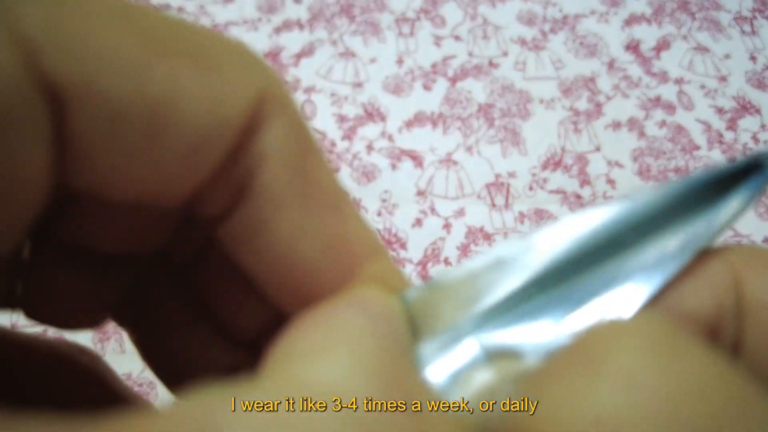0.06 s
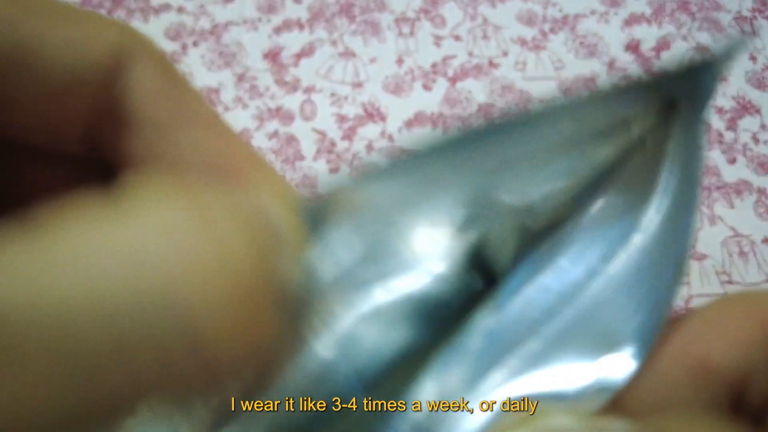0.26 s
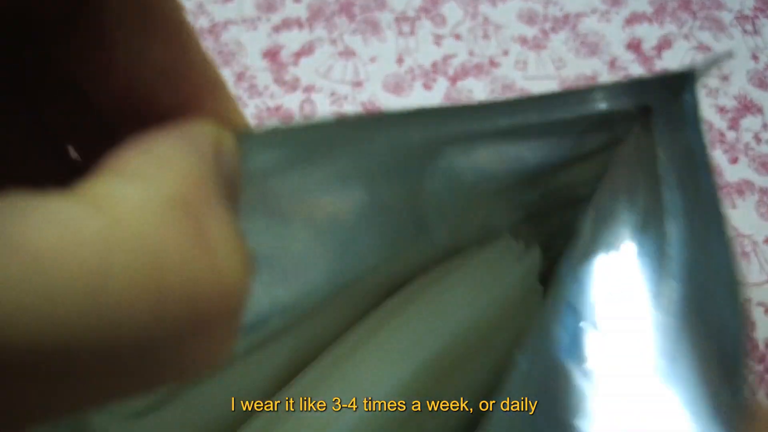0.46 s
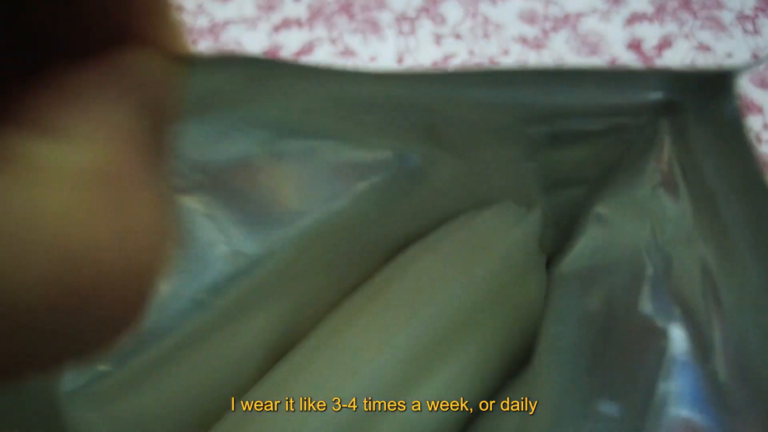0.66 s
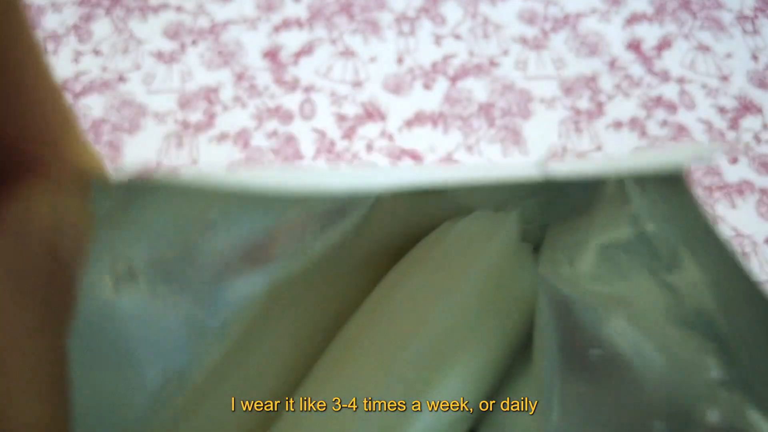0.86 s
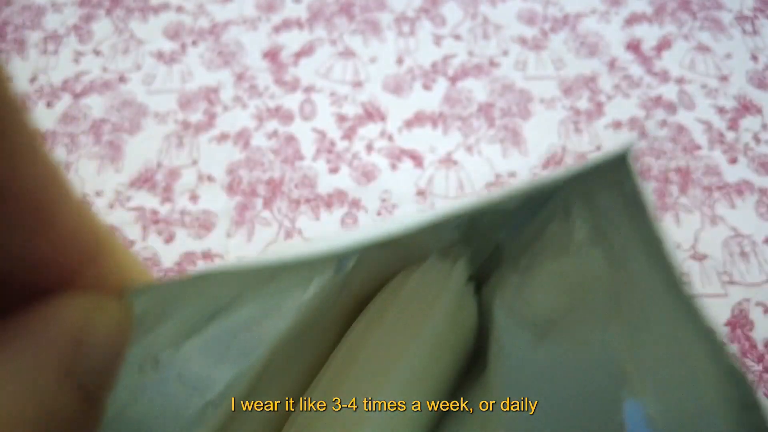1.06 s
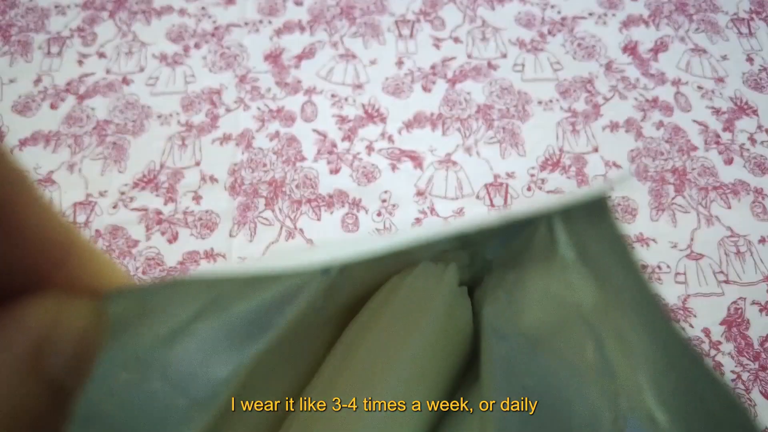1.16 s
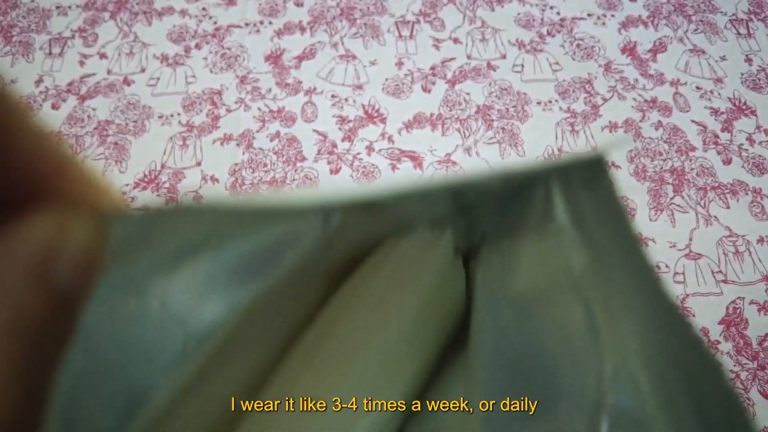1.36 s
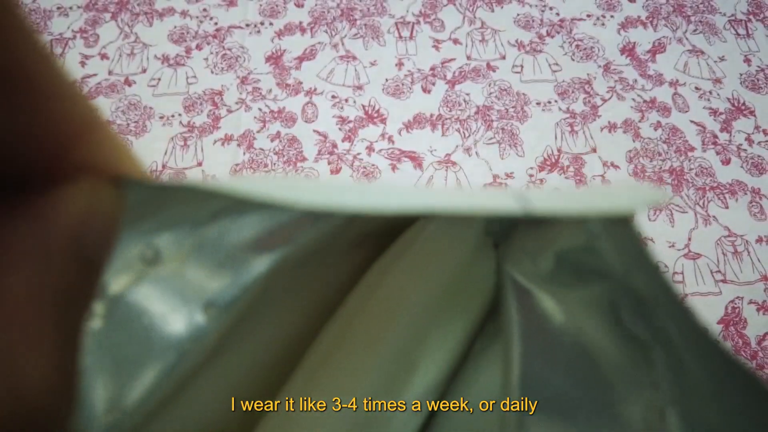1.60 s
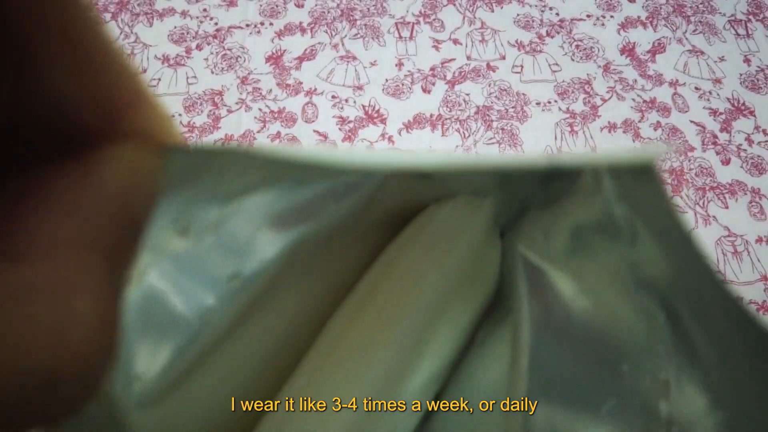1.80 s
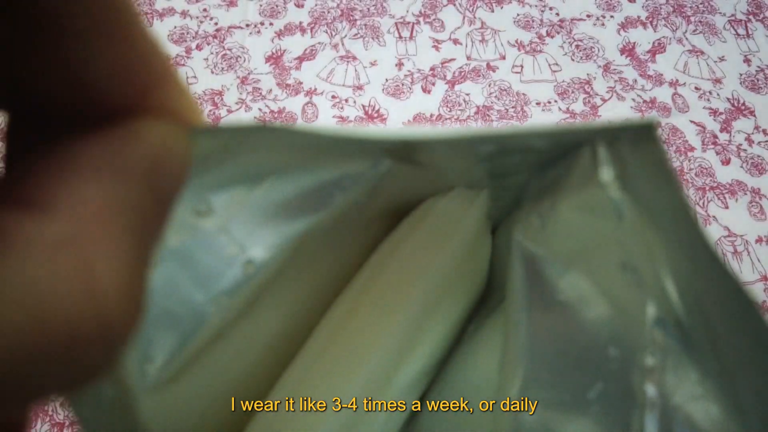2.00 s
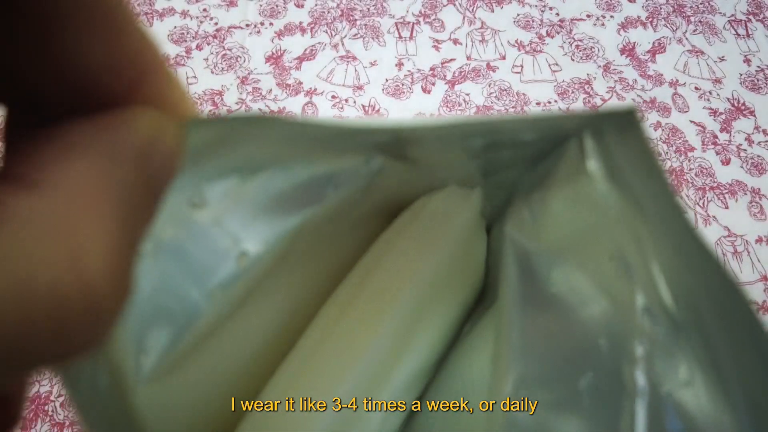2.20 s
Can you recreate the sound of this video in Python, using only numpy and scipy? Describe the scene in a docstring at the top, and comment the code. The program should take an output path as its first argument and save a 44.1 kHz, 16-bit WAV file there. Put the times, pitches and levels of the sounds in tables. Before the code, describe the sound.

A stiff foil pouch is pulled open very close to the microphone: small ticks, a short crackle, then sharp irregular snaps within the first second, followed by soft finger rustle in a quiet small room.

```python
"""Small ticks and a short crackle as the lips of a stiff foil pouch part, pulled open by hand.
The pouch is close to the microphone in a small quiet room. Its walls then buckle in sharp snaps:
noise bursts, each with a damped panel ring, and low rings where the pouch puffs its air.
Foil slides softly on the fingers as shaped noise, over a rumble of the grip.
Room air and a faint wavering hum lie underneath; a diffuse echo follows the snaps and crackle."""
import sys
import numpy as np
from scipy import signal
from scipy.io import wavfile

SR = 44100
rng = np.random.default_rng(int(sys.argv[2]) if len(sys.argv) > 2 else 0)


def log_audio(samples):
    """Write samples as a 16-bit WAV file to the path given in sys.argv[1]."""
    # one column per channel
    frames = np.atleast_2d(samples).T
    # limit to full scale, then quantise
    limited = np.clip(frames, -1, 1)
    pcm = np.round(limited * 32767).astype(np.int16)
    wavfile.write(sys.argv[1], SR, pcm)


N = 99225
T = np.arange(N) / SR  # time [s]

# Noise is shaped in bands about half an octave wide
EDGES = 22 * 2 ** (np.arange(20) * .51)  # [Hz]
CENTRES = np.sqrt(EDGES[1:] * EDGES[:-1])  # [Hz]
BANK = [signal.butter(2, pair, "band", fs=SR, output="sos") for pair in zip(EDGES, EDGES[1:])]
SHARES = np.diff(EDGES) * 2 / SR  # each band's share of the power of white noise

# Buckling walls: (time [s], crack level [dB], bass lift [dB], treble tilt [dB per octave],
# panel pitch [Hz], panel ring level [dB], ring t60 [s],
# facets that ring too: list of (pitch [Hz], level [dB]))
WALL_SNAPS = [(.2030, -16, 11, 7, 390, -20, 0.013, [(12500, 1)]), (.2120, -7, 15, 4, 1440, -33, 0.0028, []),
              (.2330, 7.5, 5, 1, 4600, -1, 0.0061, [(2650, -11), (4050, -7)]),
              (0.2476, -5.5, -5, -1, 814, -15.5, 0.0062, []), (.2790, -2.5, 5, -3, 980, -27.5, 0.007, []),
              (0.3852, -11, 8, -4.5, 2130, -32, 0.016, []),
              (0.4339, 2, -12, -1, 800, -19.5, 0.015, [(1550, -24), (3900, -21), (5800, -14.5),
              (7600, -15.5)]), (0.4578, 6.5, 9.5, 1.07, 328, -17.5, 0.011, [(4300, -15)]),
              (0.5072, 9.5, 1, 0, 1610, -8, 0.0089, [(14000, 3.5)]),
              (0.5577, 11.5, -12.5, -0.5, 1205, 1.5, 0.0052, [(6000, 1.5), (7500, 0.5)]),
              (0.7038, 13, -12.5, -3, 468, -15, 0.025, [(1200, -19), (5700, -4), (13200, 1)]),
              (0.766, 7.5, -9, -9.5, 542, -20.5, 0.015, []),
              (0.7939, -19, -5, -2.5, 915, -13.5, 0.0053, []),
              (0.9614, 6.5, -1, -2.5, 1735, -18, 0.028, [(1080, -23), (2900, -16.5), (4540, -15)]),
              (0.995, 3, -29, -18, 864, -32.5, 0.026, []),
              (1.4544, -6.5, 1, -1, 652, -25, 0.016, [(1330, -25), (1900, -20.5), (4300, -18),
              (5200, -10)])]
# Stereo width of scattered sound: (frequency [Hz], side minus mid [dB])
SCATTERED_WIDTH = [(70, -22), (250, -9), (600, -1), (1400, -6.5), (3000, -7.5), (6000, -6), (12000, -5)]
PANEL_RISE_S = 0.00029


def from_db(db):
    """Decibels to gain."""
    return 10 ** (np.asarray(db) / 20)


def unit(x):
    """Scale to an energy of one."""
    return x / np.sqrt(np.sum(x ** 2) + 1e-20)


def at_hz(points, hz):
    """Read a table on a log-frequency axis."""
    frequencies, values = np.transpose(points)
    return np.interp(np.log(hz), np.log(frequencies), values)


def level(curve):
    """Gain over time from (time [s], level [dB]) rows."""
    return from_db(np.interp(T, *np.transpose(curve)))


def swell(t, rise, decay):
    """Quick rise, exponential fall; both time constants in seconds."""
    return (1 - np.exp(-t / rise)) * np.exp(-t / decay)


def add(out, s, sound):
    """Mix a sound in at its time in seconds."""
    start = max(int(s * SR), 0)
    out[:, start:start + sound.shape[-1]] += sound[..., :N - start]


def stereo(mid, side, width_db):
    """Left and right of about unit energy each, from independent mid and side noise."""
    width = from_db(width_db)
    both = unit(mid) + width * unit(side) * np.array([[1], [-1]])
    return both / np.sqrt(1 + width ** 2)


def coloured(spectrum, drive):
    """Stereo noise shaped band by band, its grains weighted by drive; rms 1."""
    white = rng.standard_normal((2, 2, N)) * drive
    out = 0
    for k, hz in enumerate(CENTRES):
        # neighbouring bands take turns between two independent noises
        mid, side = signal.sosfilt(BANK[k], white[k % 2])
        gain = from_db(at_hz(spectrum, hz)) * np.sqrt(SHARES[k])
        out = out + gain * stereo(mid, side, at_hz(SCATTERED_WIDTH, hz))
    return unit(out) * np.sqrt(2 * N)


def hollow(x):
    """One resonance lifts the middle, a hollow colour."""
    peak_hz, q, peak_db = 1380, 6.6, -5.5
    b, a = signal.iirpeak(peak_hz, q, fs=SR)
    return x + from_db(peak_db) * signal.lfilter(b, a, x)


def crack(db, bass_db, tilt_db, size=2048):
    """A crease gives way in a burst of about a millisecond; lows linger and the sheet shivers briefly."""
    # Colour of a crack: (frequency [Hz], relative level per Hz [dB])
    crack_colour = [(100, -11), (300, -5.5), (700, 2), (1400, 3), (3000, -0.5), (5500, -4), (9000, -3),
                    (13500, -14.5), (17000, -14.5)]
    # Stereo width of direct sound: (frequency [Hz], side minus mid [dB])
    direct_width = [(200, -13), (500, -7), (1300, -18.5), (3000, -7), (6000, -1.5), (12000, 1.5)]
    rise_s, decay_s, ring_cycles = .00015, .0007, 0.67
    shiver_db, shiver_decay_s = -13.5, 0.0034
    bass_hz, treble_hz = 500, 1500
    t = np.arange(size) / SR
    white = rng.standard_normal((2, 2, size))
    shiver = from_db(shiver_db) * swell(t, decay_s, shiver_decay_s)
    out = 0
    for k, hz in enumerate(CENTRES):
        if hz < 150:  # the lowest bands stay silent
            continue
        band_decay_s = decay_s + ring_cycles / (2 * np.pi * hz)
        burst = swell(t, rise_s, band_decay_s) + shiver
        mid, side = signal.sosfilt(BANK[k], white[k % 2] * burst)
        bass_lift = bass_db / (1 + (hz / bass_hz) ** 2)
        treble_tilt = tilt_db * max(np.log2(hz / treble_hz), 0)
        colour = at_hz(crack_colour, hz) + bass_lift + treble_tilt
        gain = from_db(db + colour) * np.sqrt(SHARES[k])
        out = out + gain * stereo(mid, side, at_hz(direct_width, hz))
    return out


def ring(hz, db, t60, rise, size=8192):
    """One damped mode of a loose, fluttering sheet, a little ahead in phase and louder in one ear."""
    lag_s, pan_db = .000022, 2.5  # difference between the ears
    roughness, flutter_hz = 0.34, 500
    t = np.arange(size) / SR
    ear = rng.choice([-1, 1]) * np.array([[.5], [-.5]])  # which side the patch lies on
    flutter_noise = np.interp(t * flutter_hz, np.arange(size), rng.standard_normal(size))
    flutter = 1 + roughness * flutter_noise
    envelope = swell(t, rise, t60 / np.log(1000))
    tone = np.sin(2 * np.pi * hz * (t + ear * lag_s))
    return from_db(db + ear * pan_db) * flutter * envelope * tone


def snaps():
    """Each wall buckles with a sharp crack and sets a panel ringing."""
    out = np.zeros((2, N))
    for s, db, bass_db, tilt_db, hz, ring_db, t60, _ in WALL_SNAPS:
        add(out, s, crack(db, bass_db, tilt_db))
        add(out, s, ring(hz, ring_db, t60, PANEL_RISE_S))
    return out


def facets():
    """Small stiff facets ping with the snaps, falling by 60 dB in eighteen cycles."""
    cycles = 18
    out = np.zeros((2, N))
    for s, *_, pings in WALL_SNAPS:
        for hz, db in pings:
            add(out, s, ring(hz, db, cycles / hz, PANEL_RISE_S))
    return out


def ticks():
    """Small creases give way with a duller crack."""
    # Ticks: (time [s], level [dB])
    tick_rows = [(0.084, -14), (0.105, -12), (0.1257, -13), (0.1719, -12), (0.186, -10.5), (0.285, -15),
                 (.299, -8.5), (.444, -17), (.496, -9), (0.7007, 3.5), (1.152, -22.5)]
    bass_db, tilt_db = 0.5, -4  # bass lift [dB], treble tilt [dB per octave]
    out = np.zeros((2, N))
    for s, db in tick_rows:
        add(out, s, crack(db, bass_db, tilt_db))
    return out


def crackle():
    """Countless tiny creases of uneven size give way under strain."""
    # Crackle as the foil is strained: (time [s], level [dB])
    strain = [(0, -54), (.195, -62), (.206, -29), (.225, -37.5), (.26, -39), (.31, -47), (.41, -57.5),
              (.47, -45.5), (.54, -47), (.62, -50), (.69, -73.5), (.75, -46), (.88, -74), (2.25, -78)]
    # Colour of the crackle: (frequency [Hz], relative level per Hz [dB])
    crackle_colour = [(100, -3), (300, 2.5), (800, 5.5), (1600, -8), (3000, -3), (5000, -11.5), (9000, -17),
                      (16000, -23)]
    creases_per_s, spread_db = 8000, 2.5
    born = rng.random(N) < creases_per_s / SR
    sizes = from_db(spread_db * np.minimum(rng.exponential(1, N), 5))
    return level(strain) * coloured(crackle_colour, born * sizes + 1e-9)


def puffs():
    """The pouch swells and pushes air, or a finger bumps it: short low damped rings."""
    # Puffs and bumps: (time [s], pitch [Hz], level [dB], t60 [s])
    puff_rows = [(0.207, 116, -26, 0.021), (0.277, 115, -20.5, 0.014), (0.383, 59.3, -25.5, 0.097),
                 (0.4599, 93, -28, 0.13), (0.512, 95.5, -18.5, 0.049), (0.557, 100, -23, 0.044),
                 (0.636, 228, -31, 0.049), (0.7028, 126, -18, 0.087), (0.734, 325, -29.5, 0.042),
                 (0.854, 324, -38.5, 0.047), (0.9596, 199, -13, 0.025), (0.992, 168, -21.5, 0.018),
                 (1.152, 320, -41.5, 0.018), (1.587, 400, -47, 0.04), (1.608, 198, -33, 0.014)]
    rise_s = 0.00072
    out = np.zeros((2, N))
    for s, hz, db, t60 in puff_rows:
        add(out, s, ring(hz, db, t60, rise_s))
    return out


def sliding():
    """Foil slides on skin with a soft hiss that has a hollow colour."""
    # Slide before the hollow colour: (time [s], level [dB])
    slide = [(0, -69.5), (.35, -52.5), (.41, -64), (.6, -52), (.94, -71), (.99, -56), (1.14, -55.5),
             (1.245, -64.5), (1.31, -57), (1.43, -52), (1.51, -60), (1.57, -55.5), (1.67, -57.5),
             (1.72, -69), (1.85, -64), (1.96, -58), (2.08, -74), (2.25, -75.5)]
    # Colour of the hiss: (frequency [Hz], relative level per Hz [dB])
    slide_colour = [(300, -16), (900, -2), (1700, 3.5), (2600, -0.5), (3700, -1.5), (5300, -6.5),
                    (10000, -12.5), (13500, -7), (17000, -22)]
    return level(slide) * hollow(coloured(slide_colour, 1))


def handling():
    """Hands rumble on the pouch as low noise that rises and falls with the grip."""
    # Rumble: (time [s], level [dB])
    grip = [(0, -55), (.18, -55.5), (.22, -42.5), (.34, -57.5), (.5, -36), (.6, -55), (.75, -46),
            (.92, -61), (.98, -38), (1.06, -67), (1.3, -66.5), (1.6, -56), (1.7, -72), (2.25, -70)]
    # Colour of the rumble: (frequency [Hz], relative level per Hz [dB])
    grip_colour = [(25, -4.5), (90, -1), (200, -14), (450, -14.5), (1000, -27), (4000, -65)]
    return level(grip) * coloured(grip_colour, 1)


def room(dry, size=30000):
    """Diffuse echo of the room: noise tails by band, dying sooner in the bass and the top treble."""
    # Echo strength: (frequency [Hz], level [dB])
    echo_level = [(100, -22), (400, -18.5), (800, -13), (1300, -14.5), (2000, -17), (3200, -18.5),
                  (5000, -18.5), (8000, -15), (11000, -20), (16000, -25)]
    # Echo decay: (frequency [Hz], t60 [s])
    echo_t60 = [(150, 0.14), (1300, 0.4), (5000, 0.4), (14000, 0.12)]
    build_s = 0.002
    t = np.arange(size) / SR
    white = rng.standard_normal((2, 2, size))
    echo = 0
    for k, hz in enumerate(CENTRES):
        envelope = swell(t, build_s, at_hz(echo_t60, hz) / np.log(1000))
        mid, side = signal.sosfilt(BANK[k], white[k % 2]) * envelope
        gain = from_db(at_hz(echo_level, hz)) * np.sqrt(SHARES[k])
        echo = echo + gain * stereo(mid, side, at_hz(SCATTERED_WIDTH, hz))
    return signal.fftconvolve(dry, echo, axes=1)[:, :N]


def room_air():
    """Steady noise of the room air, mostly low."""
    # Colour of the air: (frequency [Hz], relative level per Hz [dB])
    air_colour = [(25, 5.5), (100, -2), (200, -15.5), (330, -1.5), (480, -17), (800, -21.5), (1500, -15),
                  (2600, -42), (6000, -45), (16000, -53.5)]
    return from_db(-56.5) * coloured(air_colour, 1)


def hum(count=24):
    """Steady sines whose levels waver slowly and independently."""
    # Hum tones: (frequency [Hz], rms level before the waver [dB])
    tones = [(101, -69), (200, -70), (314, -62.5)]
    waver_db = 2
    out = np.zeros(N)
    for hz, db in tones:
        waver = np.interp(T, np.linspace(0, T[-1], count), rng.standard_normal(count))
        tone = np.sqrt(2) * np.sin(2 * np.pi * (hz * T + rng.random()))
        out = out + from_db(db + waver_db * waver) * tone
    return out


def scene():
    """The pouch close by, its hollow echo, the hands, and the quiet room behind."""
    foil = snaps() + ticks() + crackle() + puffs()
    pings = facets()
    # small facets sound close up but send little into the room
    sent_to_room = foil + from_db(-5.5) * pings
    echo = hollow(room(sent_to_room))
    hands = sliding() + handling()
    return foil + pings + echo + hands + room_air() + hum()


def record(dry):
    """Peaks stop at full scale, then a steep low-pass cuts the top."""
    cutoff_hz = 16100
    low_pass = signal.ellip(10, .1, 80, cutoff_hz, fs=SR, output="sos")
    return signal.sosfilt(low_pass, np.clip(dry, -1, 1))


dry = scene()
out = record(dry)
log_audio(out)
```